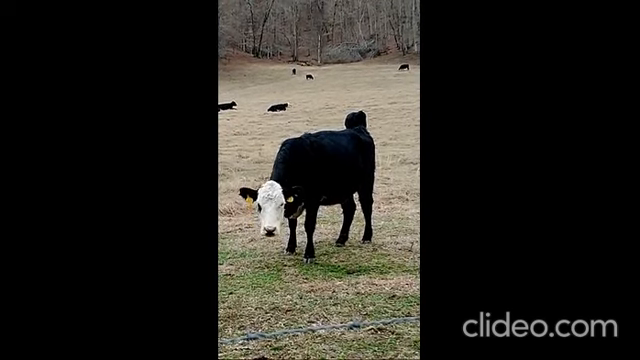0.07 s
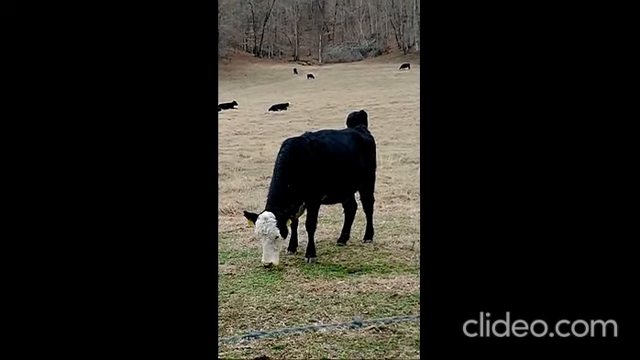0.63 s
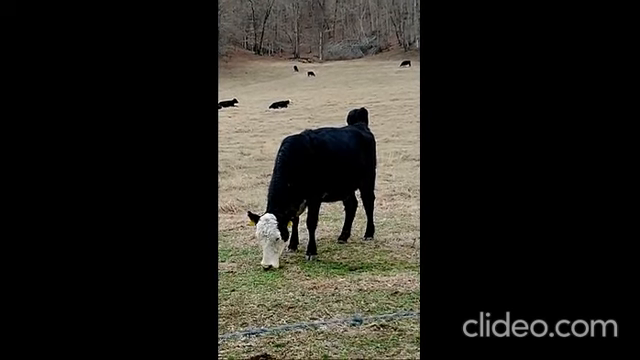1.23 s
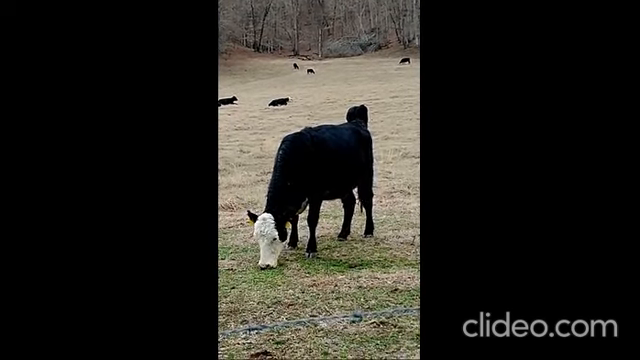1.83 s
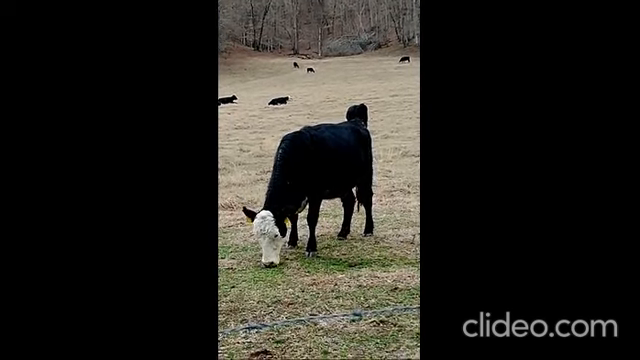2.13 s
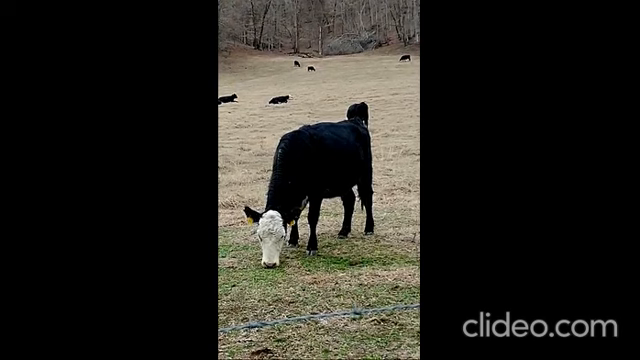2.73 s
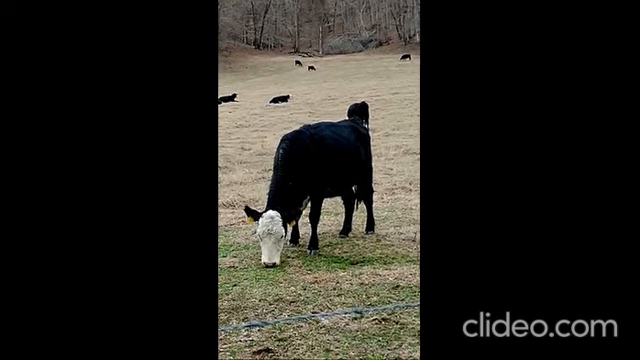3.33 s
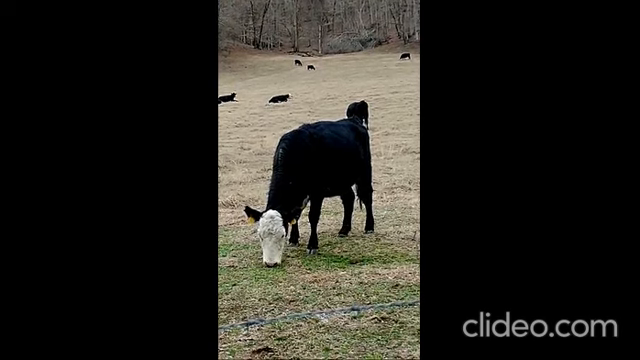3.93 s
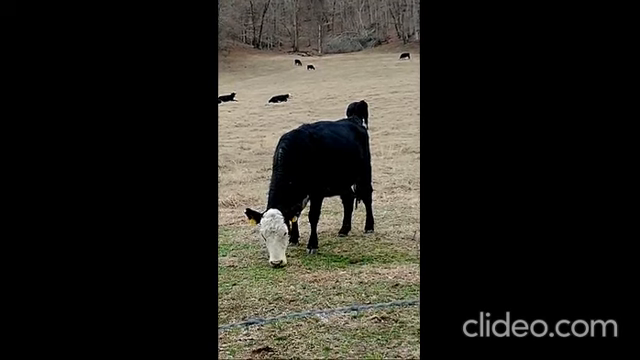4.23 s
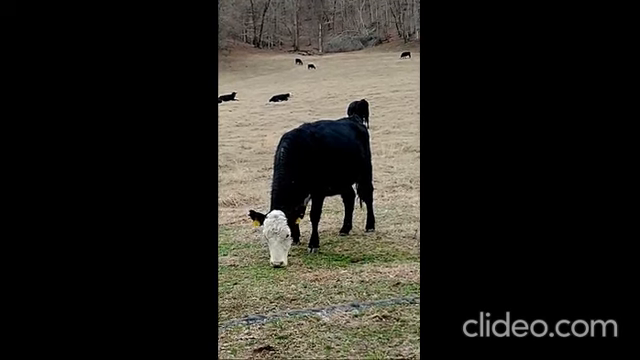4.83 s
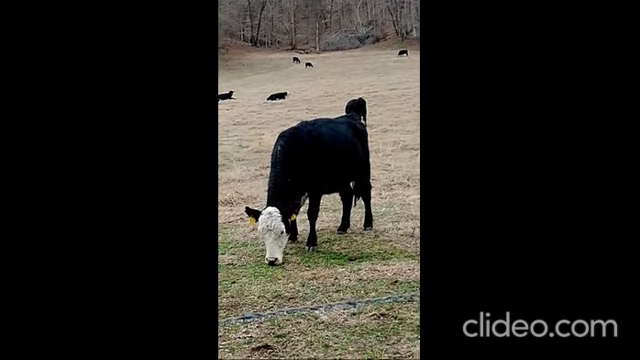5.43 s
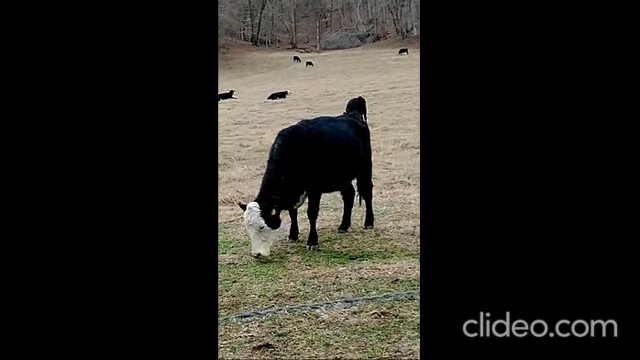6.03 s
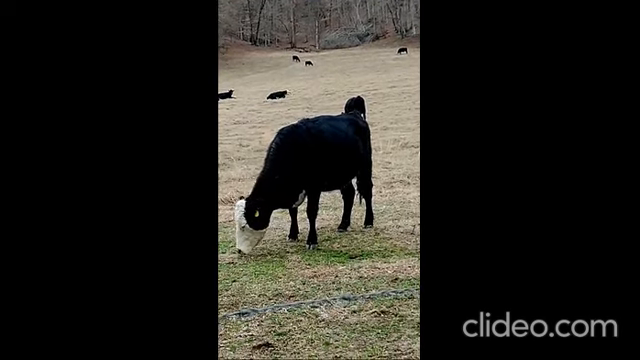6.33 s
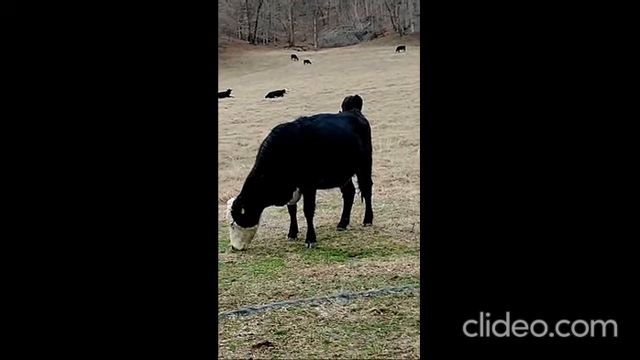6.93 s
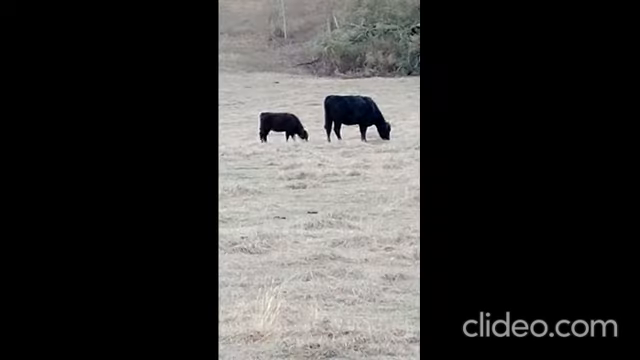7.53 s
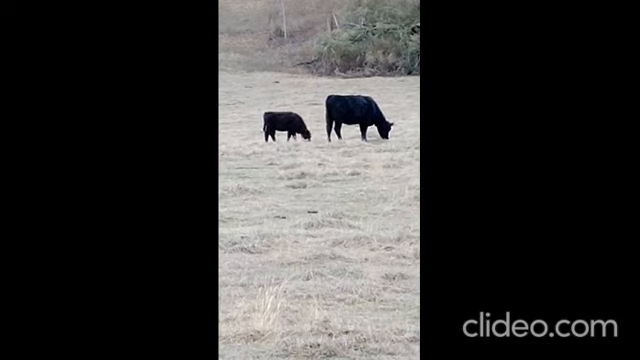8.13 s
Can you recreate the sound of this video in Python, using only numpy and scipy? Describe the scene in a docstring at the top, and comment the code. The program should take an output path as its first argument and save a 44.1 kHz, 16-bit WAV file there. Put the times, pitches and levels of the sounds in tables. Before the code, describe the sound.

Low burbling exhaust of a distant truck rises and falls over faint wind in dry grass and soft gusts on the microphone.

```python
"""A V8 truck crosses a quiet pasture, some way off. At first its fan roars while light wind hisses in dry
grass. The engine revs up and pulls, its uneven exhaust puffs burbling and its engine bay rushing, as gusts
nudge the microphone and two faint whistles sound. The grass rustles now and then. Near five seconds the
engine drops to idle, then picks up again. Just after seven seconds the sound breaks off for a moment;
it returns with the engine humming at low speed and one more whistle."""
import sys
import numpy as np
from scipy import signal
from scipy.fft import rfft, irfft, next_fast_len
from scipy.io import wavfile
from scipy.ndimage import uniform_filter1d, map_coordinates

SR = 44100
rng = np.random.default_rng(int(sys.argv[2]) if len(sys.argv) > 2 else 0)


def to_wav(sig):
    """Store sig (one row per channel, or 1-D mono) as 16-bit WAV at the path in sys.argv[1].

    Samples outside -1..1 are clipped; the rate is SR.
    """
    pcm = np.clip(np.atleast_2d(sig), -1, 1) * 32767
    pcm = np.round(pcm).astype(np.int16)
    wavfile.write(sys.argv[1], SR, pcm.T)  # frames by channels


N = 361179
TIME = np.arange(N) / SR
PAUSE_START_S, PAUSE_END_S = 7.331, 7.551

# How alike the high hiss is in both ears. Each row: frequency in Hz, likeness (1 is identical).
TREBLE_LIKENESS = [(3000, 0.5), (5000, 0.47), (6200, 0.25), (7200, 0.81), (9500, 0.84), (12000, 0.73)]


def amp(db):
    """Turn decibels into a gain to multiply by."""
    return 10 ** (np.asarray(db) / 20)


def unit(x):
    """Scale a sound to an average (rms) level of 1."""
    return x / np.sqrt(np.mean(x ** 2) + 1e-20)


def along(points, hz):
    """Read between rows of (Hz, value), with octaves evenly spaced."""
    freqs, values = np.transpose(points)
    return np.interp(np.log(hz + 1), np.log(freqs + 1), values)


def curve(table):
    """Join rows of (seconds, value) with straight lines."""
    return np.interp(TIME, *np.transpose(table))


def control(table, late_value):
    """Follow a table until the middle of the pause, then switch to late_value."""
    return np.where(TIME > (PAUSE_START_S + PAUSE_END_S) / 2, late_value, curve(table))


def swell(middle_s, length_s):
    """One smooth rise from 0 to 1 and back."""
    return np.cos(np.pi * np.clip((TIME - middle_s) / length_s, -.5, .5))


def swells(table):
    """Add up one swell for each row of (middle in seconds, length in seconds, dB)."""
    return sum(amp(db) * swell(middle, length) for middle, length, db in table)


def wobble(rate):
    """A smooth curve through `rate` random values a second."""
    knots = rng.standard_normal(int(N * rate / SR) + 4)
    steps = np.linspace(0, len(knots) - 1, 10 * len(knots))
    return np.interp(TIME * rate, steps, map_coordinates(knots, [steps]))


def filtered(x, response):
    """Turn each frequency up or down by the gain response(hz)."""
    size = next_fast_len(N + SR // 2)
    return irfft(rfft(x, size) * response(np.fft.rfftfreq(size, 1 / SR)), size)[..., :N]


def noise(spectrum, likeness, patchy_db):
    """Stereo noise of level 1, with louder and softer patches drifting through it."""
    bands = signal.stft(rng.standard_normal((2, N)), nperseg=512)[2]
    patches = uniform_filter1d(rng.standard_normal(bands.shape[1:]), size=5, axis=0)
    patches = uniform_filter1d(patches, size=50, axis=1)
    pair = signal.istft(bands * amp(patchy_db * unit(patches)), nperseg=512)[1][:, :N]

    def response(hz):
        """The less alike the ears are, the more goes to the side signal."""
        turn = np.arccos(np.clip(along(likeness, hz), -1, 1)) / 2
        return amp(along(spectrum, hz)) * [np.cos(turn), np.sin(turn)]

    mid, side = filtered(pair, response)
    return unit(np.array([mid + side, mid - side]))


def airflow(cycle, load_db, rush_db):
    """Fan roar, rolling rumble and the engine bay's rush, throbbing slightly with the firings."""
    # The tone of each noise. Each row: frequency in Hz, relative level in dB.
    fan_tone = [(40, -32.5), (90, 9), (200, -2), (330, -0.5), (430, 3.5), (520, 4.5), (620, 4.5), (720, -3),
                (950, -3.5), (1200, -2.5), (1700, -15), (2400, -24), (3800, -16), (6000, -54)]
    rumble_tone = [(25, -12.5), (45, -11), (80, 4.5), (150, 8), (250, 2.5), (350, -1), (470, 0), (600, -4),
                   (750, -11.5), (1000, -22.5), (2000, -70)]
    bay_tone = [(300, -58), (550, -5.5), (780, 3.5), (1000, -0.5), (1250, -1), (1700, -2), (2050, -4.5),
                (2400, -4.5), (2850, -8), (3200, -12.5), (4200, -29), (8000, -84)]
    # How alike both ears are. Each row: frequency in Hz, likeness (1 is identical).
    likeness = [(200, 0.95), (700, 0.98), (1400, 0.86), (3000, 0.7), (6000, .3)]
    roar_db = -41 - 15.5 * TIME ** 2  # dies away ever faster as the truck pulls off
    rumble_db = 1.4 + rush_db + 0.26 * (load_db - rush_db)  # partly follows the load
    fan = amp(roar_db) * noise(fan_tone, likeness, patchy_db=-1.5)
    rumble = amp(rumble_db) * noise(rumble_tone, [(30, 0.85), (120, 1.0), (700, 0.93)], patchy_db=0)
    bay = amp(rush_db + 7) * noise(bay_tone, likeness, patchy_db=1)
    throb = 1 + 0.062 * np.cos(8 * cycle)
    return (fan + rumble + bay) * throb


def exhaust(cycle, firing_hz, load_db):
    """Eight even firings a cycle boom and drone; one cylinder bank's uneven beat adds the burble."""
    # The pipe's two resonances. Each row: frequency in Hz, relative level in dB.
    pipe = [(47, -7), (55, -8), (65, -11.5), (83, 0.5), (88, 0), (91, 6), (97, 22), (112, 27), (130, 12),
            (164, -1.5), (174, 6), (182, 9)]
    # Tones above the boom. Each row: multiple of the firing rate, relative level in dB.
    overtone_levels = [(3, -16), (4, -36), (5, -23.5), (6, -34.5), (8, -28), (9, -33)]
    # Tones of the burble. Each row: multiple of the engine's cycle rate, relative level in dB.
    burble_levels = [(5, -19.5), (7, -28.5), (9, -13), (10, -29.5), (11, -1.5), (12, -17.5), (13, -12),
                     (14, -25.5), (15, -20.5), (17, -13.5), (18, -14), (19, -5), (20, -15), (21, -27.5),
                     (23, -19.5), (26, -22.5), (29, -27.5), (34, -26)]
    # boom and burble come with the throttle; off it, mostly the drone is left
    speed_gain = uniform_filter1d(np.gradient(firing_hz) * SR, size=SR // 6)
    throttle_db = 0.17 * np.clip(speed_gain, -60, 60)
    boom = amp(along(pipe, firing_hz) + throttle_db)
    drone = amp(along(pipe, 2 * firing_hz) + 0.44 * (load_db - load_db.max()))
    burble = amp(throttle_db)
    gain = amp(load_db - 1) / np.sqrt(boom ** 2 + drone ** 2 + burble ** 2)  # the load sets the total

    def tone(multiple, phase=0):
        """A tone lags as it climbs through the pipe's resonance, so the chug smooths into a hum."""
        pipe_hz, width_hz = 210, 40
        lag = 2 * np.arctan(2 * (multiple * firing_hz / 8 - pipe_hz) / width_hz) - 5 * np.pi / 9
        return np.sqrt(2) * np.cos(multiple * cycle + phase - lag)

    overtones = sum(amp(db) * tone(8 * multiple) for multiple, db in overtone_levels)
    sharp_db = 2.5 + 1.1 * (firing_hz - firing_hz.max())  # firings sharpen toward top speed
    flutter_db = 0.7 * wobble(13)
    even = boom * (tone(8) + amp(sharp_db + flutter_db) * overtones) + drone * tone(16)
    # the burble's tones add up to puffs at the points in the cycle where the nearer bank fires
    bank = np.array([0, 2, 5, 7]) / 8
    timing = lambda multiple: np.angle(np.exp(-2j * np.pi * multiple * bank).sum())
    uneven = sum(amp(db) * tone(multiple, timing(multiple)) for multiple, db in burble_levels)
    roughness = 1 + 0.06 * wobble(70)  # no two firings are equally strong
    return gain * (even + burble * uneven) * roughness


def truck(rush_db):
    """The turning engine times both the exhaust and the throb of the air."""
    # Engine speed. Each row: time in seconds, firings per second.
    speed = [(0.0, 47.3), (0.32, 47.9), (0.53, 49.3), (0.83, 65.6), (1.1, 77.7), (1.28, 82.1), (2.27, 83.6),
             (2.64, 88.0), (3.21, 90.5), (4.47, 90.9), (4.82, 69.8), (5.02, 62.6), (5.61, 54.5),
             (5.77, 57.9), (6.1, 72.5), (6.34, 75.4), (6.65, 86.6), (7.3, 86.6)]
    # Engine load before and after the pause. Each row: time in seconds, relative exhaust level in dB.
    load = [(0.1, -51), (0.4, -58), (0.64, -42.5), (0.68, -47), (1.22, -32.5), (2.34, -37), (3.03, -35.5),
            (4.11, -41.5), (4.53, -47), (4.83, -66), (5.67, -75), (6.02, -60), (6.12, -66.5), (6.72, -56.5),
            (7.3, -62.5)]
    late_load = [(7.57, -45), (7.588, -46.5), (7.94, -42.5), (7.978, -49.5), (8.18, -38)]
    firing_hz = control(speed, late_value=55.6)
    load_db = control(load, curve(late_load))
    cycle = 2 * np.pi * np.cumsum(firing_hz / 8) / SR
    return exhaust(cycle, firing_hz, load_db) + airflow(cycle, load_db, rush_db)


def hiss_and_fizz(rush_db):
    """A high hiss that follows the wind, and a fine fizz that rises with the engine's rush."""
    # Wind strength. Each row: time in seconds, relative level in dB.
    wind = [(0.1, -63.5), (0.56, -58.5), (1.16, -68.5), (1.98, -67.5), (2.63, -61.5), (3.95, -66),
            (4.09, -62.5), (4.91, -68.5), (6.08, -64), (7.3, -69)]
    # The tone of each noise. Each row: frequency in Hz, relative level in dB.
    hiss_tone = [(2200, -16), (3200, 0), (3650, 6), (4000, 4), (4600, 5.5), (5500, 4), (6300, 0),
                 (7000, -23.5), (8500, -42.5)]
    fizz_tone = [(4500, -29), (6700, 9), (7500, 2), (8500, -2), (10000, -9.5), (13000, -22.5), (16000, -20)]
    # How wide the fizz spreads. Each row: time in seconds, gain of the side signal in dB.
    spread = [(0, -7), (4.6, -15), (5.1, 6.5), (7.3, 11), (7.55, 14.5)]
    wind_db = control(wind, late_value=-68.5)
    wind_lead_db = wind_db - rush_db
    fizz_db = rush_db - 15.5 + 0.14 * (wind_lead_db - wind_lead_db.mean())
    hiss = amp(wind_db + 1.32) * noise(hiss_tone, TREBLE_LIKENESS, patchy_db=1.5)
    fizz = amp(fizz_db) * noise(fizz_tone, TREBLE_LIKENESS, patchy_db=0.5)
    centre = fizz.mean(axis=0)
    return hiss, centre + amp(curve(spread)) * (fizz - centre)


def valley_hush():
    """The steady, far-off hush of the valley."""
    # Its tone. Each row: frequency in Hz, relative level in dB.
    hush_tone = [(25, -17.5), (60, -11), (120, -19.5), (250, 1.5), (500, 5), (680, 6.5), (790, 2), (920, 3),
                 (1400, 3.5), (2200, -13.5), (7000, -23.5), (11000, -23.5), (16000, -27)]
    return amp(-62.5) * noise(hush_tone, [(100, 0.9), (1500, 1.0), (10000, 1.0)], patchy_db=0.5)


def whines():
    """Fuzzy tones swell and fade in the rush."""
    # Each row: middle in seconds, pitch in Hz, width in Hz, length in seconds, level in dB,
    # glide in Hz per second.
    tones = [(.04, 557, 168.3, .7, -51.5, 2), (0.86, 4420, 420, 1.1, -68, 0),
             (2.3, 4000, 260, 1.4, -77.5, 62), (3.5, 573.4, 50.4, 1.84, -60.5, 0),
             (4.362, 6580, 604, 0.71, -76, 0.5), (5.42, 7800, 200, .14, -78, 2502),
             (5.663, 3620, 280.4, 0.65, -68.5, 98.5), (6.1, 795, 105.1, 2.3, -64, 3),
             (6.845, 1300, 800, 0.27, -60, 0.5), (6.857, 648, 297.3, 0.39, -61, -1),
             (7.95, 345.7, 149.6, 1.193, -56.5, 0)]
    out = np.zeros(N)
    for middle, hz, width_hz, length, db, glide in tones:
        since = np.clip(TIME - middle, -length / 2, length / 2)
        phase = 2 * np.pi * np.cumsum(hz + glide * since) / SR
        fuzz = wobble(width_hz) * np.cos(phase) + wobble(width_hz) * np.sin(phase)
        out += amp(db) * swell(middle, length) * fuzz
    return out


def from_direction(pair):
    """Sound from one side reaches the far ear a little later."""
    # The truck's direction. Each row: time in seconds, milliseconds the left ear lags the right.
    direction = [(0, -0.14), (.5, -0.071), (1.2, -0.06), (2.2, -0.024), (3, 0.034), (7.3, 0.059),
                 (7.55, -0.023)]
    shift = curve(direction) / 1000 * SR / 2  # each ear takes half of the lag
    return np.array([map_coordinates(ear, [np.arange(N) - sign * shift], mode="nearest")
                     for ear, sign in zip(pair, (1, -1))])


def buffeting():
    """Gusts thump each side of the microphone separately, with a faint breeze between them."""
    # Each row: middle in seconds, length in seconds, relative level in dB.
    gusts = [(.47, 0.081, -44), (1.17, .25, -39), (1.5, 1, -45.5), (2.2, 0.53, -56), (7.0, .6, -71.5),
             (8.15, 1, -56)]
    # Their tone. Each row: frequency in Hz, relative level in dB.
    gust_tone = [(20, -24), (45, -5), (70, 3), (110, 6.5), (160, -5.5), (230, -20.5), (400, -31),
                 (800, -74.5)]
    lumps = amp(4.9 * np.array([wobble(14), wobble(12)]))
    strength = amp(-85) + amp(-7) * swells(gusts)
    return strength * unit(lumps * noise(gust_tone, [(30, 0.0038)], patchy_db=1.5))


def whistles():
    """Soft, slightly wavering whistles, far off to the right."""
    # Each row: middle in seconds, pitch in Hz, length in seconds, relative level in dB.
    notes = [(1.186, 1285, 0.099, -62), (1.84, 1280, 0.15, -58), (7.7, 1426, 0.17, -61)]
    out = np.zeros(N)
    for middle, hz, length, db in notes:
        pitch_hz = hz * (1 + 0.0089 * wobble(40))
        out += amp(db) * swell(middle, length) * np.sin(2 * np.pi * np.cumsum(pitch_hz) / SR)
    return out * amp([[-6], [3]])


def rustles():
    """Dry grass stirs briefly."""
    # Each row: middle in seconds, length in seconds, level in dB.
    stirs = [(2.75, 0.73, -73), (5.05, 0.2, -73.5), (6.2, .15, -82), (7.62, 0.46, -72.5), (8.06, .2, -74.5)]
    # Their tone. Each row: frequency in Hz, relative level in dB.
    rustle_tone = [(3500, -18), (6000, 4.5), (8000, 1), (10500, -7), (13000, -15), (16000, -20.5)]
    return swells(stirs) * noise(rustle_tone, TREBLE_LIKENESS, patchy_db=5)


def scene():
    """Truck and pasture, brighter on the left, with gusts at the microphone."""
    # The engine bay's rush. Each row: time in seconds, relative level in dB.
    bay_rush = [(0.1, -52), (0.54, -54.5), (0.92, -60.5), (1.44, -60.5), (2.71, -57), (4.59, -56.5),
                (4.83, -64), (6.76, -66), (6.84, -61.5), (7.3, -68)]
    # Left-right balance. Each row: frequency in Hz, dB by which the left is louder.
    balance = [(400, -0.5), (700, 0.4), (1500, 4.5), (2300, 4), (2700, 2), (3600, 5), (5800, 7.5),
               (7200, 0), (9000, -1.8), (14000, 0)]
    rush_db = control(bay_rush, late_value=-60.5)
    hiss, fizz = hiss_and_fizz(rush_db)
    surround = fizz + valley_hush()
    directed = from_direction(truck(rush_db) + hiss + whines())
    lean = lambda hz: amp(np.outer([.5, -.5], along(balance, hz)))
    return filtered(directed + surround + rustles(), lean) + whistles() + buffeting()


def record(dry):
    """The sound drops out, comes back softer and swells to full level; the highest treble is cut."""
    return_db, return_s, top_hz = -8, 0.063, 15700
    recovery = amp(return_db * np.exp(-np.abs(TIME - PAUSE_END_S) / return_s))
    gain = (TIME < PAUSE_START_S) + (TIME > PAUSE_END_S) * recovery
    return filtered(dry * uniform_filter1d(gain, size=128), lambda hz: hz < top_hz)


dry = scene()
out = record(dry)
to_wav(out)
```